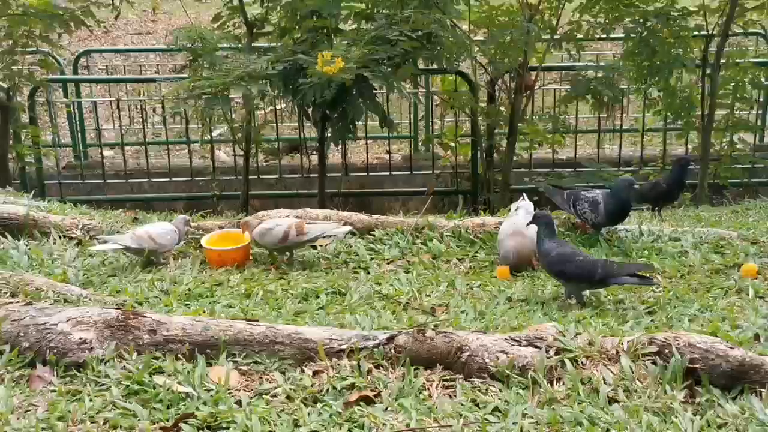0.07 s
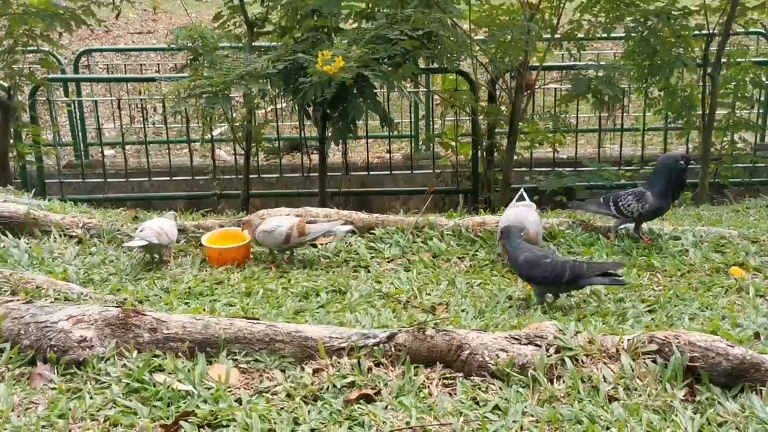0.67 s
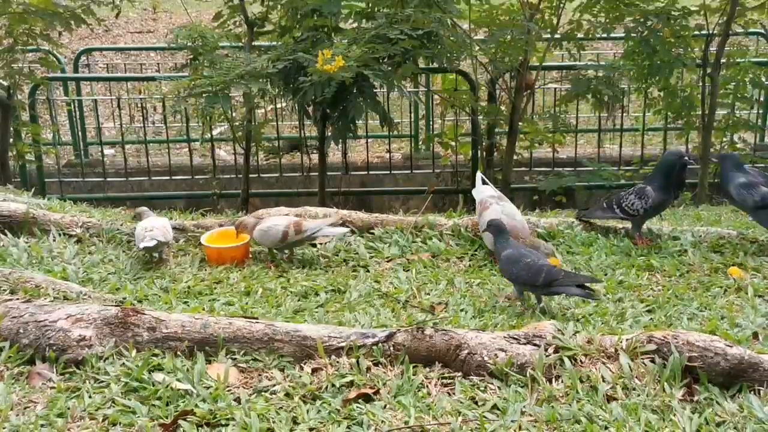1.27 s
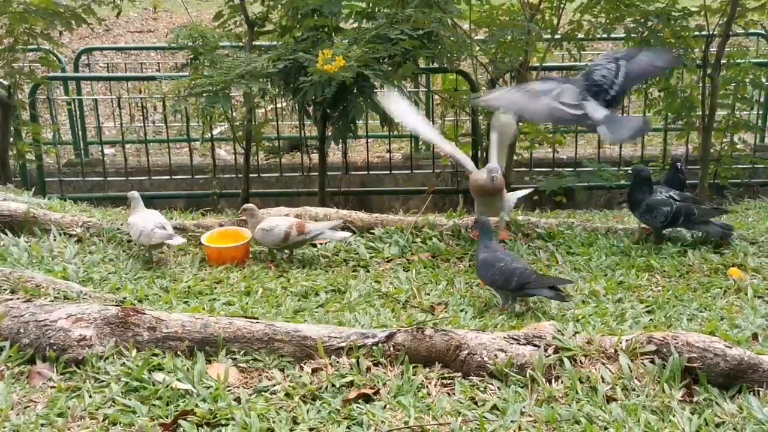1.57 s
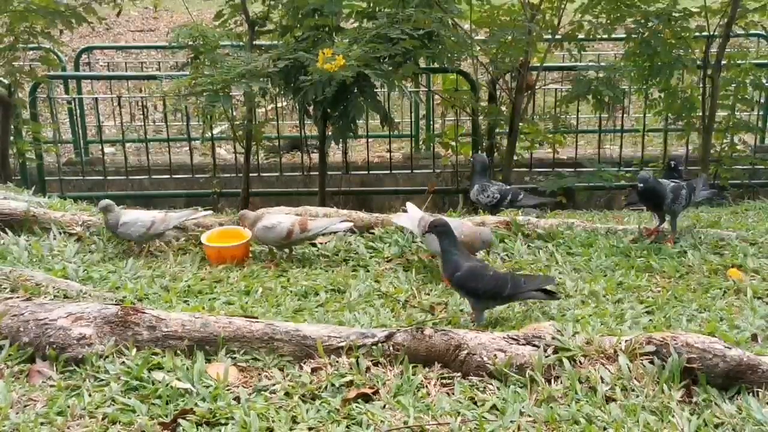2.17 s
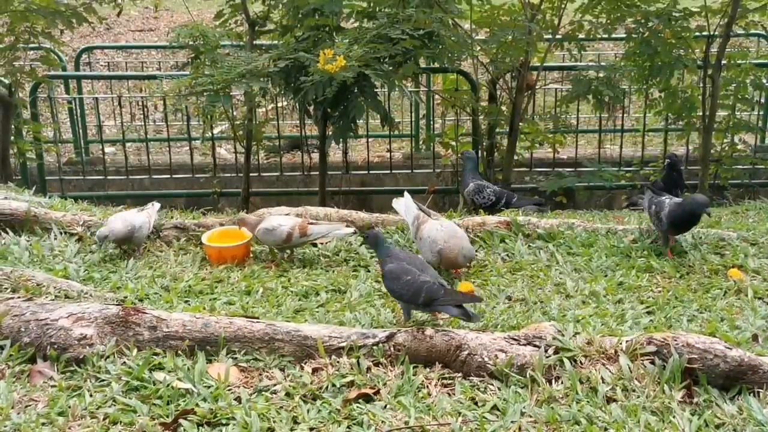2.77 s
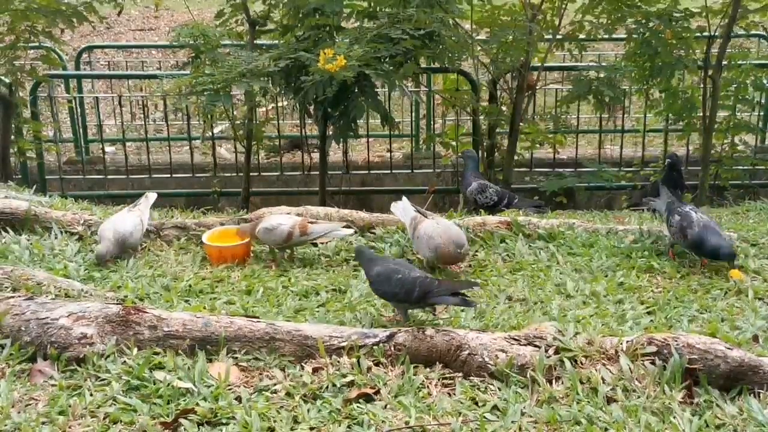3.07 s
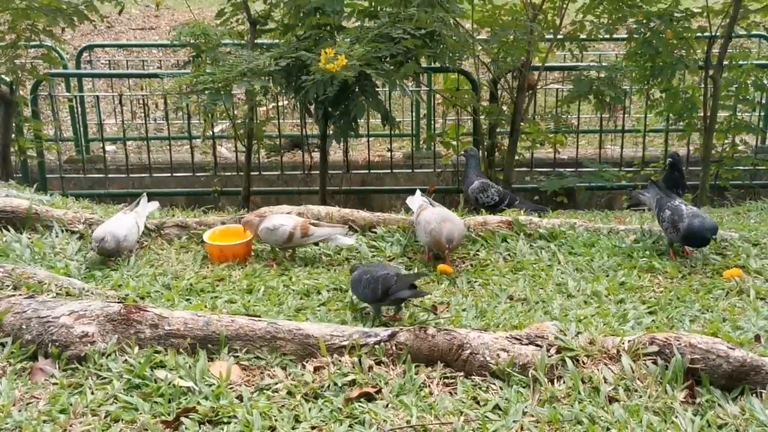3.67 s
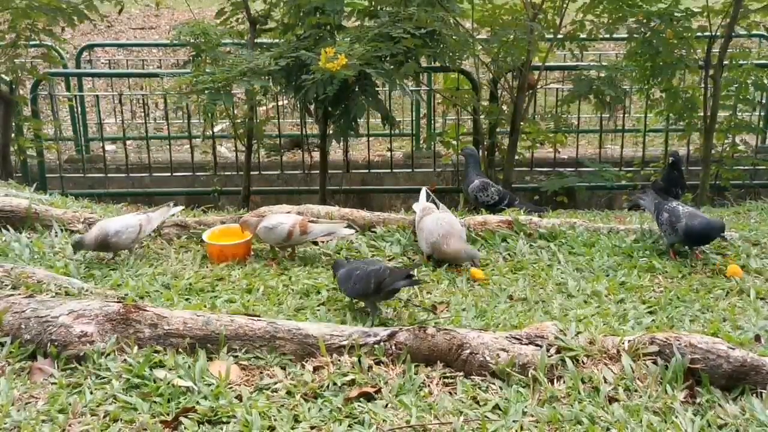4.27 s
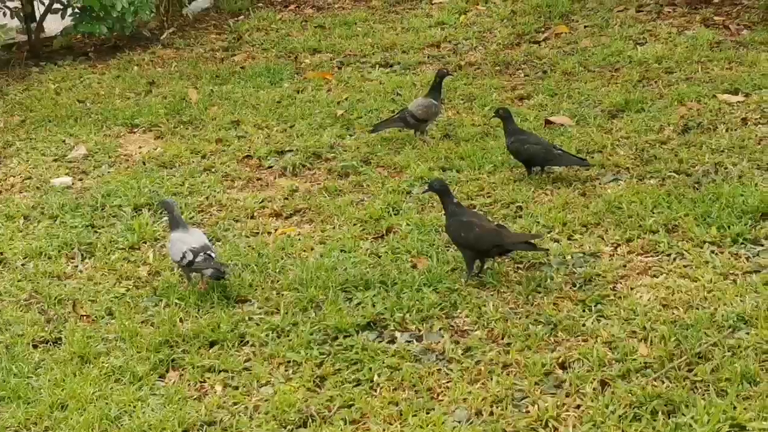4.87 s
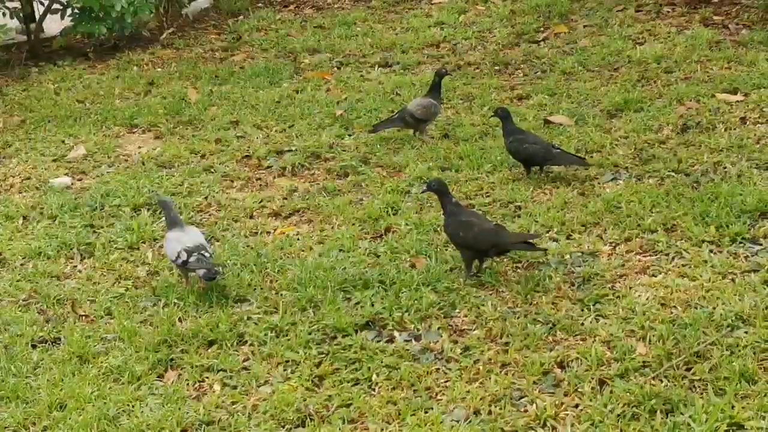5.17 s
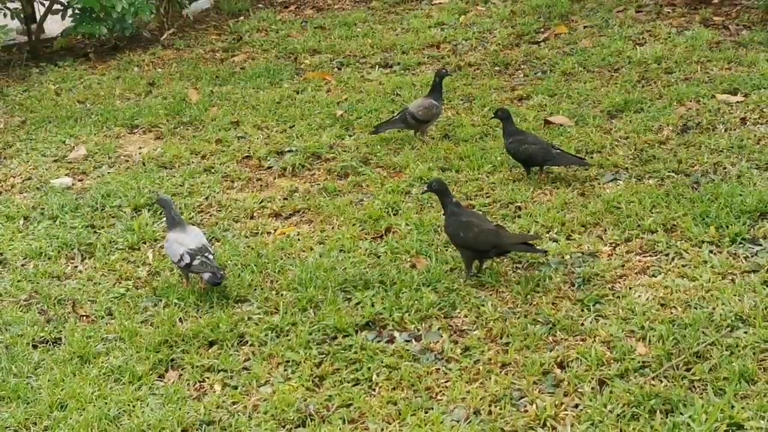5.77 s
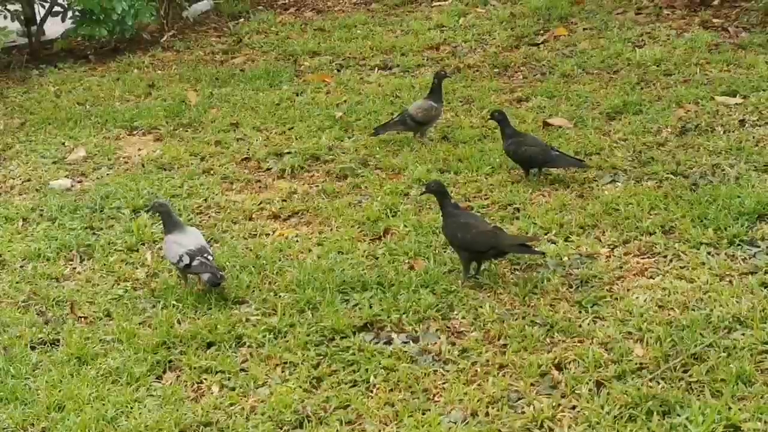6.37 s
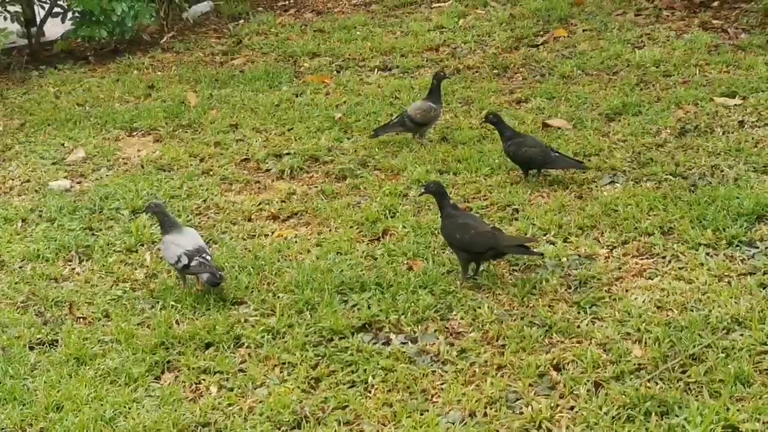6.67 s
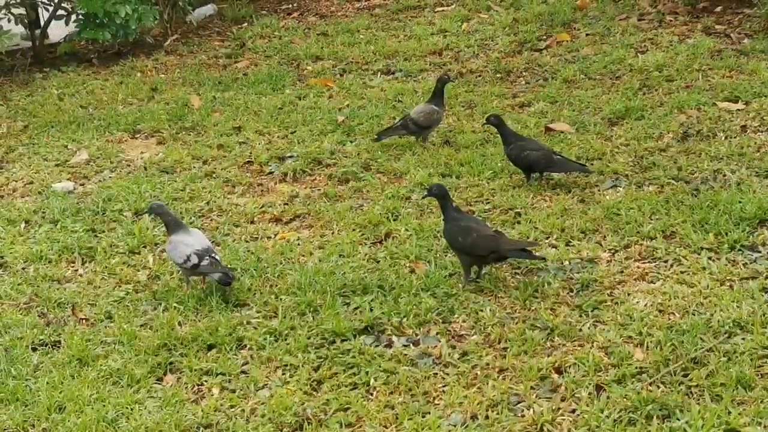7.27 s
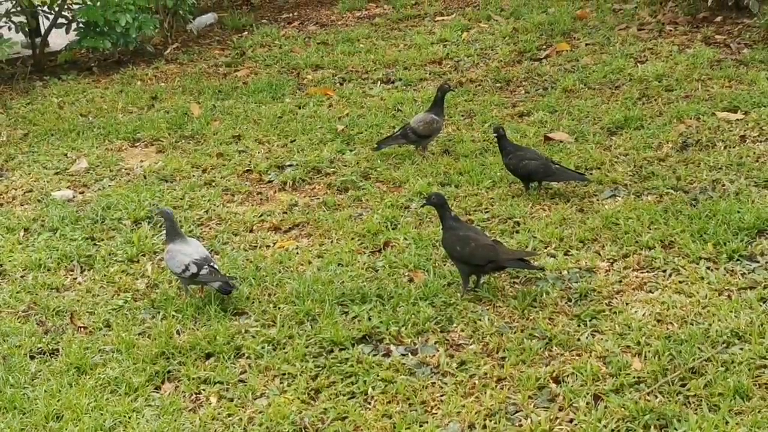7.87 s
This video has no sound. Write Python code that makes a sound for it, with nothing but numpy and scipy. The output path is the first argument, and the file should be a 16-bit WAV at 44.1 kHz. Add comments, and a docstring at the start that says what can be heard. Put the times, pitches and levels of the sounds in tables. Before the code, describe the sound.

After a brief silence, a low distant traffic rumble and steady hiss begin at 0.3 seconds on a park lawn, with pigeons ticking faintly in dry grass. A bird on the right whistles down a scale, and around 1 second a lower bird sings pips and held notes. At 1.5 seconds a pigeon takes off with a sharp wing clap and fading flutter, while a far vehicle drones until past 3 seconds. Three soft low bumps come between 2.2 and 2.8 seconds, along with a thin whistle and a yip. Dry snaps and rustles cluster nearby at 3 seconds. The low bird returns at 4.2 seconds. The sound cuts out at 4.7 and resumes at 5 seconds, when the traffic swells once. Sparrows chirp on the right at about 5.5, 6.7 to 6.9 and 7.9 seconds, among a few faint snaps in the grass.

```python
"""Pigeons feed on two park lawns, each heard after a short silence, over far traffic and a steady hiss.
By the fence, birds whistle from trees whose trunks scatter the calls, and beaks and feet tick in dry
leaves. A pigeon takes off with a clap of its wings while a distant vehicle drones past; three soft low
bumps follow, then snaps and rustles. From 5 s the microphone stands on the open lawn: the traffic
swells once, sparrows chirp on the right, and a few more snaps come from the grass."""
import sys
import numpy as np
from scipy import signal
from scipy.fft import rfft, irfft, next_fast_len
from scipy.io import wavfile
from scipy.ndimage import uniform_filter1d, map_coordinates

SR = 44100
rng = np.random.default_rng(int(sys.argv[2]) if len(sys.argv) > 2 else 0)


def digitize_waveform(pressure):
    """Quantize a signal to 16-bit integers and store it at the path in sys.argv[1].

    Rows of a 2-D input are taken as channels; values are limited to [-1, 1].
    """
    field = np.atleast_2d(pressure).T
    bounded = np.clip(field, -1, 1)
    quanta = np.round(bounded * 32767).astype(np.int16)
    wavfile.write(sys.argv[1], SR, quanta)


N = 354034
TIME = np.arange(N) / SR


# Spectra of a dry snap, a wing clap and brushing feathers. Each row: frequency in Hz, relative dB.
SNAP_SPECTRUM = [(500, -28), (2000, -11.5), (4000, -2.5), (6600, 1), (8500, -6), (11000, -5), (15500, -14)]
CLAP_SPECTRUM = [(300, -35), (900, -3), (1350, 12.5), (2000, -3), (3500, -41), (8000, -28)]
RUSTLE_SPECTRUM = [(700, -21.5), (2000, -9.5), (4000, 2.5), (6500, 4.5), (8500, -1.5), (11000, -2),
                   (15500, -3)]
# Wingbeats leaving the microphone. Each row: peak time in seconds, level in dB.
WINGBEATS = [(1.707, -58), (1.86, -63.5), (1.937, -61), (2.13, -67.5)]

def take_off(crack_s=1.4806, crack_t60=.02):
    """A pigeon's wing tips meet with a crack and a hollow clap; feathers rustle through the next beats."""
    crack = amp(-32.5) * (TIME >= crack_s) * plateau(crack_s, crack_s, 0, 60 / crack_t60)
    clap = amp(-41) * swell(1.4825, width_s=.0055)
    flurry = amp(-53.5) * plateau(1.446, 1.446, rise_db_per_s=300, fall_db_per_s=45.5)
    beats = sum(amp(db) * swell(s, width_s=.017) for s, db in WINGBEATS)
    return (pan(-1.8) * crack * grit(SNAP_SPECTRUM, spiky_db=3)
            + clap * grit(CLAP_SPECTRUM, spiky_db=.5)
            + (flurry + beats) * grit(RUSTLE_SPECTRUM, spiky_db=2.5))


# Beaks and feet in dry leaves. Each row: start in seconds, level in dB, left minus right in dB.
SNAPS = [(1.387, -48.5, 2), (2.931, -44, 1), (3.0266, -46.5, 3), (3.0302, -37, -12), (3.042, -45.5, 0),
         (3.053, -47, 6), (3.062, -49.5, 0.5), (5.521, -53.5, -7.5), (6.7452, -54, -5), (7.012, -60, -5),
         (7.8286, -60, -5)]
# The ring of a dry stalk. Each row: frequency in Hz, level against the snap in dB, t60 in seconds.
STALK_MODES = [(4500, -7, .03), (6680, -7.5, .022)]
# Stirring in the grass. Each row: peak time in seconds, width in seconds, level in dB.
RUSTLES = [(2.985, .022, -59), (3.045, 0.033, -53.5), (3.38, .094, -64), (3.77, .025, -61),
           (5.258, .026, -64.5)]

def pigeons_feeding(snap_t60=.02):
    """Near the microphone, pigeons rustle the grass and snap dry stalks, which ring briefly."""
    snaps, rings = np.zeros((2, 2, N))
    t = np.arange(SR // 10) / SR
    for s, db, side_db in SNAPS:
        add(snaps, s, pan(side_db) * amp(db - 60 * t / snap_t60))
        for hz, mode_db, t60 in STALK_MODES:
            detuned_hz = hz * (1 + .02 * rng.standard_normal())
            ring = amp(db + mode_db - 60 * t / t60) * np.sin(2 * np.pi * detuned_hz * t)
            add(rings, s, pan(side_db) * ring)
    rustles = sum(amp(db) * swell(s, width) for s, width, db in RUSTLES)
    return snaps * grit(SNAP_SPECTRUM, spiky_db=3) + rings + rustles * grit(RUSTLE_SPECTRUM, spiky_db=3)


def flock_pecking(gap_scale_s=1 / 9, tick_db=-63, spread_db=2, t60=.022):
    """The flock's beaks and feet tick faintly at random in the dry grass."""
    gap, size, side = rng.standard_normal((200, 3)).T
    starts = np.cumsum(np.abs(gap)) * gap_scale_s
    ticks, t = np.zeros((2, N)), np.arange(SR // 20) / SR
    for s, db, side_db in zip(starts, tick_db + spread_db * size, 2 * side):
        add(ticks, s, pan(side_db) * amp(db - 60 * t / t60))
    return ticks * grit(SNAP_SPECTRUM, spiky_db=1)


# Bumps on the first lawn. Each row: peak time in seconds, width in seconds, pitch in Hz, level in dB.
BUMPS = [(2.185, 0.0063, 401, -36), (2.7, 0.005, 406, -43), (2.778, 0.0038, 422, -37.5)]

def bumps():
    """Soft bumps near the centre, each a few cycles of one low, well-damped tone."""
    pulses = sum(amp(db) * swell(s, width) * np.cos(2 * np.pi * hz * (TIME - s))
                 for s, width, hz, db in BUMPS)
    return pan(.8) * np.sqrt(2) * pulses


# Sparrows to the right of the open lawn. Each row: start in seconds, length in seconds, end pitch in Hz,
# level in dB, left minus right in dB, scatter against the direct call in dB.
CHIRPS = [(5.483, 0.079, 3340, -47.8, -8.5, -1), (6.668, 0.055, 3860, -61, -3, 9),
          (6.71, .04, 4110, -59.5, -7, 5), (6.888, .095, 3380, -44.5, -8, -4.5),
          (7.918, 0.08, 4020, -56.5, -6, 9)]
# The course of one chirp. Each row: share of its length, pitch from end (0) to top (1), relative dB.
CHIRP_SHAPE = [(0, 1, -21), (.15, .8, -15), (.19, .39, -1), (.42, .29, 1.5), (.58, .25, -6), (.7, .12, -4),
               (.92, .02, -1), (1, 0, -22)]

def sparrows(top_hz=6700, trill_hz=270, trill_depth=.068, rasp=.0404, flutter_db=4.2):
    """Steep falling chirps, made harsh by a fast trill in pitch and an uneven flutter in strength."""
    out, jitter, flutter = np.zeros((2, N)), wobble(600), wobble(350)
    share, heights, levels = np.transpose(CHIRP_SHAPE)
    for s, length, end_hz, db, side_db, wet_db in CHIRPS:
        t = np.arange(int(length * SR)) / SR
        hz = end_hz + (top_hz - end_hz) * np.interp(t / length, share, heights)
        hz *= 1 + trill_depth * np.sin(2 * np.pi * trill_hz * t) + rasp * np.interp(s + t, TIME, jitter)
        strength_db = np.interp(t / length, share, levels) + flutter_db * np.interp(s + t, TIME, flutter)
        tone = amp(strength_db) * np.sin(2 * np.pi * np.cumsum(hz) / SR)
        add(out, s, amp(db) * pan(side_db) * among_trees(unit(tone), wet_db, near_db=2.5))
    return out


# Pips just right of centre. Each row: start in seconds, level in dB.
PIPS = [(.807, -49), (.921, -54.5), (.98, -48.5), (1.072, -48), (1.183, -50.5), (4.228, -51.5),
        (4.473, -53), (4.587, -55)]
# Held notes just left of centre. Each row: start in seconds, length in seconds, pitch in Hz, level in dB.
HELD_NOTES = [(0.82, 0.13, 1339, -50), (1.206, 0.13, 1268, -57), (4.248, 0.184, 1282, -58.5),
              (4.628, 0.088, 1150, -55)]

def low_singer():
    """A low-voiced bird in the trees sings two phrases of rising pips and held, slightly arched notes."""
    out = np.zeros((2, N))
    pip_pitch = glide(length_s=.024, hz=980, bend=.19)
    for s, db in PIPS:
        add(out, s, amp(db) * pan(-2.2) * whistle(pip_pitch, quaver=.01, wet_db=-3.5))
    for s, length, hz, db in HELD_NOTES:
        pitch = glide(length, hz, bend=-.04, arch=.014)
        add(out, s, amp(db) * pan(2.5) * whistle(pitch, quaver=.014, wet_db=-3))
    return out


# A falling song by the fence. Each row: start in seconds, length in seconds, pitch in Hz,
# fall as a share of the pitch, level in dB.
SCALE_NOTES = [(0.272, 0.064, 3303, 0.0094, -50), (0.339, 0.1, 3324, 0.0097, -59),
               (0.415, .08, 3040, .04, -54), (.495, .07, 2748, .15, -47.5),
               (0.532, .075, 2570, .025, -50.5)]

def scale_singer():
    """A bird well to the right of the microphone whistles down a scale of sagging notes."""
    out = np.zeros((2, N))
    for s, length, hz, fall, db in SCALE_NOTES:
        pitch = glide(length, hz, bend=-fall, arch=.006)
        add(out, s, amp(db) * whistle(pitch, quaver=.025, wet_db=.5))
    return pan(-14.5) * out


# Yips near the centre. Each row: start in seconds, level in dB.
YIPS = [(2.461, -50.5), (4.455, -51.5)]
# Birds far off to the right. Each row: start in seconds, length in seconds, pitch in Hz, level in dB.
FAR_NOTES = [(5.999, .26, 3920, -73), (7.422, .28, 3950, -75), (7.645, .16, 12000, -77)]

def other_birds(slide_from_hz=6040, slide_to_hz=4850, hold_s=.022, sag_hz_per_s=19500):
    """Two downslurred yips, a thin whistle that holds, slides down and levels off, and faint far notes."""
    out = np.zeros((2, N))
    yip_pitch = glide(length_s=.018, hz=2022, bend=-.1, arch=.018)
    for s, db in YIPS:
        add(out, s, amp(db) * pan(1.8) * whistle(yip_pitch, quaver=.01, wet_db=-7))
    t = np.arange(int(.11 * SR)) / SR
    slide_pitch = np.clip(slide_from_hz - sag_hz_per_s * (t - hold_s), slide_to_hz, slide_from_hz)
    slide = whistle(slide_pitch, quaver=.012, wet_db=0, fade_db_per_s=66)
    add(out, 2.253, amp(-52.5) * pan(-7.5) * slide)
    for s, length, hz, db in FAR_NOTES:
        note = whistle(glide(length, hz), quaver=.012, wet_db=5, fade_db_per_s=20)
        add(out, s, amp(db) * pan(-8) * note)
    return out


# A whistle's octave overtone. Each row: the note's pitch in Hz, overtone against the note in dB.
OCTAVE_LEVELS = [(2900, -36.5), (3250, -5), (3400, -4), (3900, -60)]

def whistle(hz, quaver, wet_db, fade_db_per_s=0, quaver_rate=260):
    """One quavering note along the pitch curve hz, heard through the trees."""
    t = np.arange(len(hz)) / SR
    drift = map_coordinates(rng.standard_normal(SR // 100), [t * quaver_rate])
    phase = 2 * np.pi * np.cumsum(hz * (1 + quaver * drift)) / SR
    envelope = np.abs(np.sin(np.pi * t / t[-1])) ** .41 * amp(-fade_db_per_s * t)
    octave = amp(along(OCTAVE_LEVELS, hz.mean())) * np.sin(2 * phase)
    return among_trees(unit(envelope * (np.sin(phase) + octave)), wet_db, near_db=-7.5)


# How long the grove holds a call. Each row: frequency in Hz, t60 in seconds.
GROVE_DECAY = [(300, .35), (2500, 0.87), (5000, 0.64), (12000, 0.33)]

def among_trees(call, wet_db, near_db, near_t60=.11):
    """A call reaches the microphone directly, off nearby trunks, and as the grove's long scatter."""
    hz, t, noise = signal.stft(rng.standard_normal((2, SR // 2)), SR, nperseg=256)
    tail = signal.istft(noise * amp(-60 * t / along(GROVE_DECAY, hz)[:, None]), SR, nperseg=256)[1]
    near = rng.standard_normal(tail.shape) * amp(-60 * np.arange(tail.shape[1]) / SR / near_t60)
    paths = amp(wet_db) * tail / np.linalg.norm(tail[0]) + amp(near_db) * near / np.linalg.norm(near[0])
    paths[:, 0] += 1  # the direct path
    return signal.fftconvolve(call[None], paths / np.linalg.norm(paths[0]), axes=1)


# The spectrum of one distant vehicle. Each row: frequency in Hz, relative dB.
VEHICLE_DRONE = [(90, -46), (160, -1.5), (220, 0.5), (310, -1.5), (400, -8), (700, -10.5), (1100, -37.5)]

def vehicle():
    """A vehicle passes far from the fence; its drone comes up quickly and fades slowly."""
    passing = plateau(1.44, 2.97, rise_db_per_s=27, fall_db_per_s=10.5)
    return amp(-54.5) * passing * rush(VEHICLE_DRONE, FENCE_BALANCE, patchy_db=2.5)


# Engines, tyres and hiss by the fence and on the open lawn. Each row: frequency in Hz, relative dB.
FENCE_RUMBLE = [(11, -30.5), (18, -6), (91, 1), (146, -6.5), (259, -12), (343, -18.5), (380, -24),
                (490, -45), (840, -120)]
FENCE_WASH = [(150, -26), (300, -6.5), (480, -3.5), (700, -2.5), (1000, -6), (1700, -7.5), (2400, -6.5),
              (2800, -11.5), (3400, -21), (6000, -50)]
FENCE_HISS = [(1500, -37), (3300, 2.5), (6300, 3.5), (6900, 0), (7500, -6), (8200, -7.5), (9200, 10),
              (10200, -4.5), (11500, -10), (15800, -12)]
LAWN_RUMBLE = [(11, -26.5), (18, -18.5), (38, 4.5), (54, 0), (113, -3), (152, -4), (193, -6), (269, -13.5),
               (343, -15), (380, -21), (490, -28), (840, -120)]
LAWN_WASH = [(150, -38), (320, -2), (450, -2.5), (700, -2.5), (1000, -5), (1700, -11), (2150, -8),
             (2800, -13), (3400, -24), (6000, -48.5)]
LAWN_HISS = [(1500, -17), (3300, 1.5), (6000, 0.5), (6800, 1.5), (7700, -11.5), (9700, -10.5),
             (10700, -3.5), (11800, -15), (15800, -17.5)]
# Which way the background leans at each spot. Each row: frequency in Hz, left minus right in dB.
FENCE_BALANCE = [(50, 4), (250, 3.5), (450, -1.5), (700, -1.5), (1300, 0.5), (2500, -8.5), (3600, -1),
                 (6400, -6), (7800, 5), (9200, -2), (14000, -5)]
LAWN_BALANCE = [(50, 3.5), (200, 1.5), (550, -2.5), (1400, -0.5), (2600, -9), (4000, -5.5), (6700, -11),
                (7900, 0), (10600, -11.5), (14000, -8.5)]

def far_traffic(start_s, rumble, wash, hiss, balance, rumble_db, wash_db, hiss_db, settle_s=.15):
    """Uneven engine rumble, steady tyre wash and hiss; the recorder's level settles just after start_s."""
    recorder_db = 4 * np.exp(-np.maximum(TIME - start_s, 0) / settle_s)
    engines = amp(rumble_db + .61 * wobble(5)) * rush(rumble, balance, patchy_db=.28)
    tyres = amp(wash_db + recorder_db + .24 * wobble(6.5)) * rush(wash, balance, patchy_db=.87)
    hissing = amp(hiss_db + .55 * recorder_db + .3 * wobble(2.8)) * rush(hiss, balance, patchy_db=1.53)
    return engines + tyres + hissing


# How alike distant noise is across the stereo microphone. Each row: frequency in Hz, correlation.
COHERENCE = [(40, 0.95), (180, 0.96), (350, 0.82), (700, 0.45), (1400, -0.3), (3000, 0.1), (12000, -.1)]

def rush(spectrum, balance, patchy_db):
    """Diffuse stereo noise with patches of random gain; the mean of its channels has rms 1."""
    bins = signal.stft(rng.standard_normal((2, N)), nperseg=512)[2]
    patches = uniform_filter1d(rng.standard_normal(bins.shape[1:]), size=5, axis=0)
    patches = uniform_filter1d(patches, size=14, axis=1)
    pair = signal.istft(bins * amp(patchy_db * unit(patches)), nperseg=512)[1][:, :N]

    def mid_side_gains(hz):
        angle = np.arccos(np.clip(along(COHERENCE, hz), -1, 1)) / 2
        return amp(along(spectrum, hz)) * [np.cos(angle), np.sin(angle)]

    mid, side = filtered(pair, mid_side_gains)
    stereo = filtered(np.array([mid + side, mid - side]), lambda hz: pan(along(balance, hz)))
    return stereo / np.std(stereo.mean(axis=0))


def grit(spectrum, spiky_db):
    """Stereo noise of rms 1, broken into tiny grains."""
    grains = rng.standard_normal((2, N)) * amp(spiky_db * wobble(900))
    return unit(filtered(grains, lambda hz: amp(along(spectrum, hz))))


def glide(length_s, hz, bend=0, arch=0):
    """A pitch curve that moves by the share bend and bows up by the share arch on the way."""
    progress = np.linspace(0, 1, int(length_s * SR))
    return hz * (1 + bend * progress + arch * (1 - (2 * progress - 1) ** 2))


def swell(s, width_s):
    """A bell-shaped envelope around time s."""
    return np.exp(-np.minimum(((TIME - s) / width_s) ** 2, 100))


def plateau(start, end, rise_db_per_s, fall_db_per_s):
    """An envelope that rises to 1 at start, holds until end and falls away."""
    return amp(-rise_db_per_s * np.maximum(start - TIME, 0) - fall_db_per_s * np.maximum(TIME - end, 0))


def wobble(rate):
    """A smooth random curve, rate knots a second."""
    return map_coordinates(rng.standard_normal(int(N * rate / SR) + 4), [TIME * rate])


def amp(db):
    """Decibels to gain."""
    return 10 ** (np.asarray(db) / 20)


def unit(x):
    """x at rms 1."""
    return x / np.sqrt(np.mean(x ** 2) + 1e-20)


def along(points, hz):
    """(Hz, value) points read on a log axis."""
    knots_hz, values = np.transpose(points)
    return np.interp(np.log(hz + 1), np.log(knots_hz + 1), values)


def filtered(x, response):
    """x through a gain that depends on frequency."""
    size = next_fast_len(N + SR // 2)
    return irfft(rfft(x, size) * response(np.fft.rfftfreq(size, 1 / SR)), size)[..., :N]


def pan(side_db):
    """Left and right gains of constant power; positive is left."""
    gains = amp(np.array([side_db, -side_db]).reshape(2, -1) / 2)
    return gains / np.sqrt(np.mean(gains ** 2, axis=0))


def add(track, s, sound):
    """Mix a sound into the track at time s."""
    part = track[:, max(round(s * SR), 0):][:, :sound.shape[-1]]
    part += sound[..., :part.shape[1]]


def scene(move_s=4.85):
    """The microphone stands by the fence until move_s, then on the open lawn."""
    fence = far_traffic(STRETCHES[1][0], FENCE_RUMBLE, FENCE_WASH, FENCE_HISS, FENCE_BALANCE,
                        rumble_db=-43.5, wash_db=-55, hiss_db=-64)
    surge_db = 5.8 * swell(5.19, width_s=.28)
    lawn = far_traffic(STRETCHES[2][0], LAWN_RUMBLE, LAWN_WASH, LAWN_HISS, LAWN_BALANCE,
                       rumble_db=-47 + surge_db, wash_db=-55.5, hiss_db=-67)
    birds = low_singer() + scale_singer() + other_birds() + sparrows()
    background = np.where(TIME < move_s, fence + vehicle() + flock_pecking(), lawn)
    return pigeons_feeding() + take_off() + bumps() + birds + background


# When the microphone is open: an instant, the fence, the open lawn. Each row: start and end in seconds.
STRETCHES = [(0, .014), (.284, 4.713), (5.013, 8.1)]

def record(dry, cut_s=.0015, top_hz=15850):
    """The sound drops abruptly to silence between the stretches, and nothing above top_hz passes."""
    gate = sum((TIME >= start) * np.exp(-np.maximum(TIME - end, 0) / cut_s) for start, end in STRETCHES)
    return filtered(dry * uniform_filter1d(gate, size=40), lambda hz: hz < top_hz)


dry = scene()
out = record(dry)
digitize_waveform(out)
```